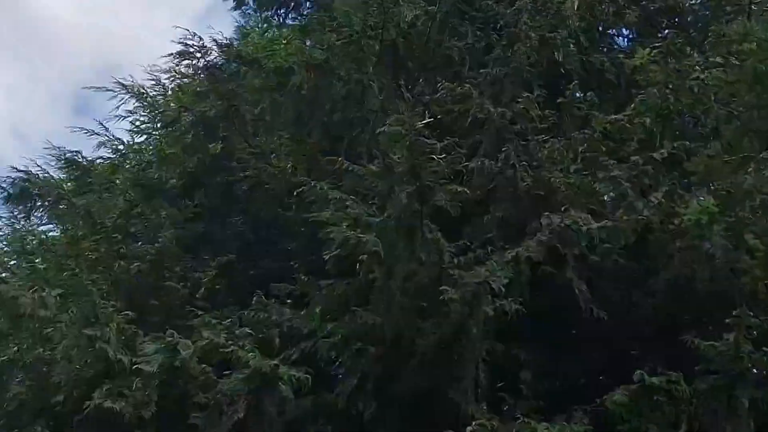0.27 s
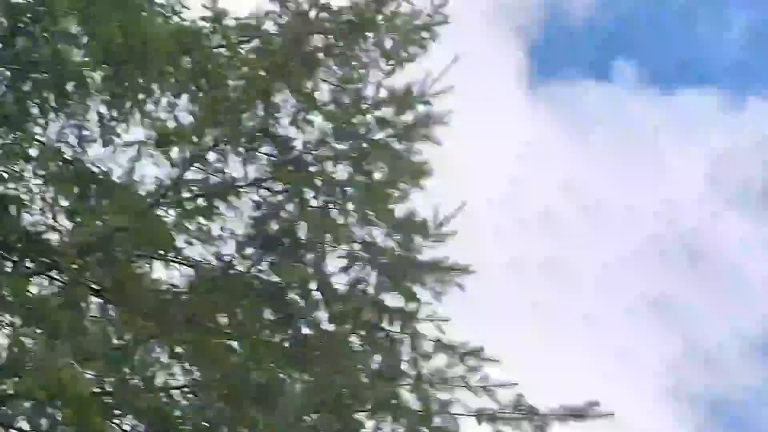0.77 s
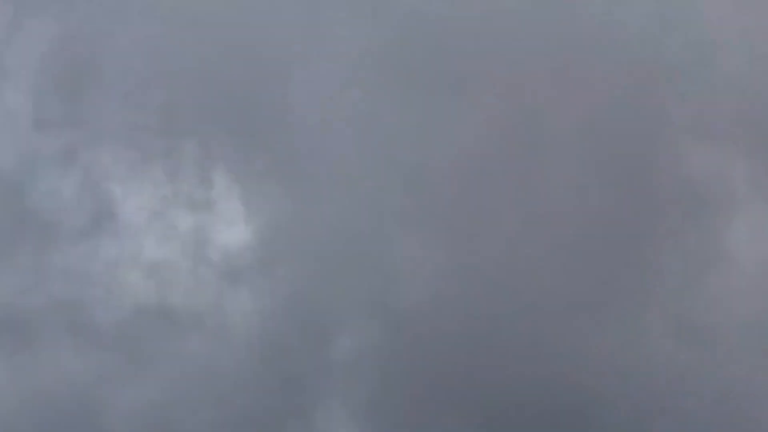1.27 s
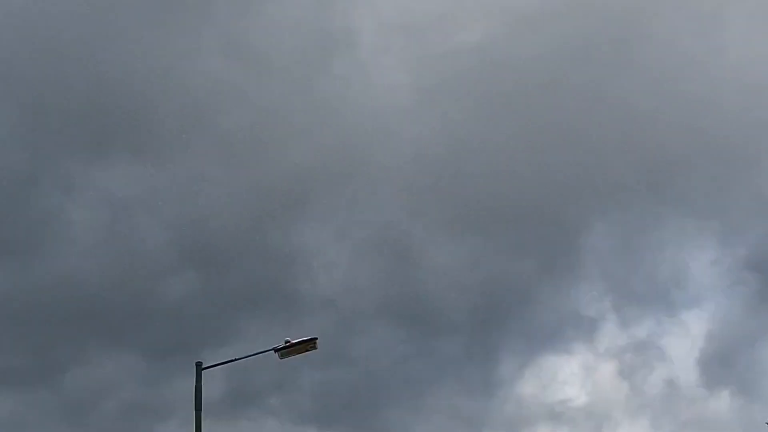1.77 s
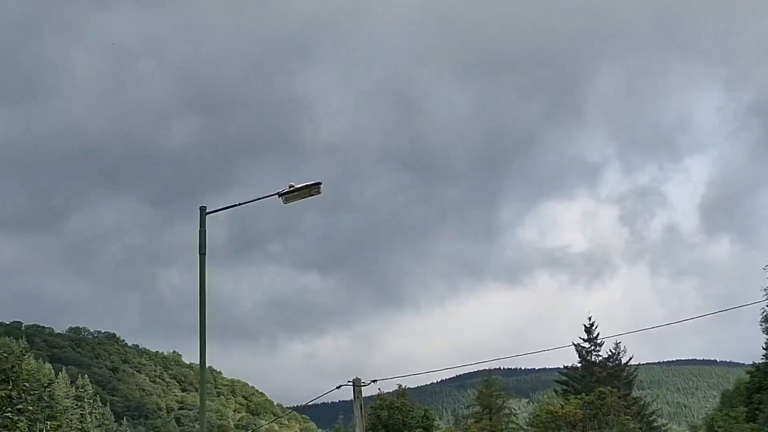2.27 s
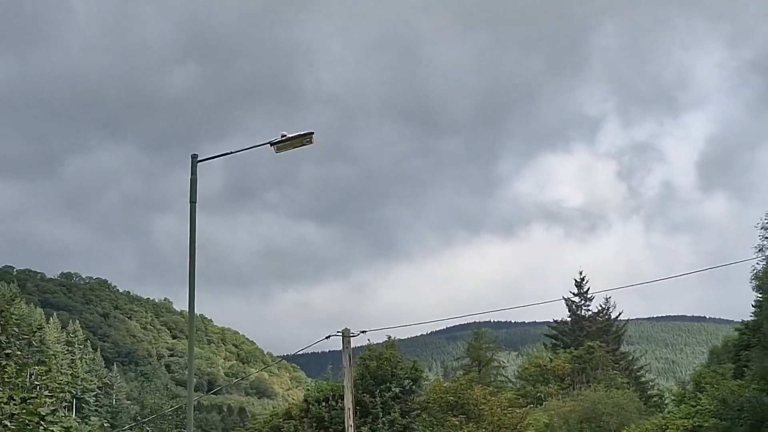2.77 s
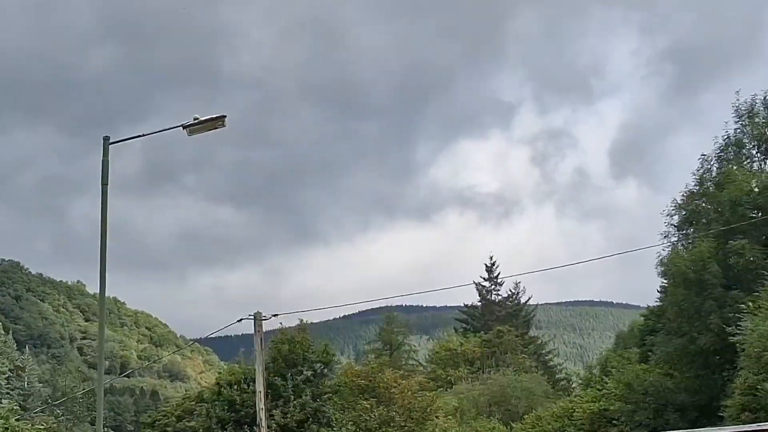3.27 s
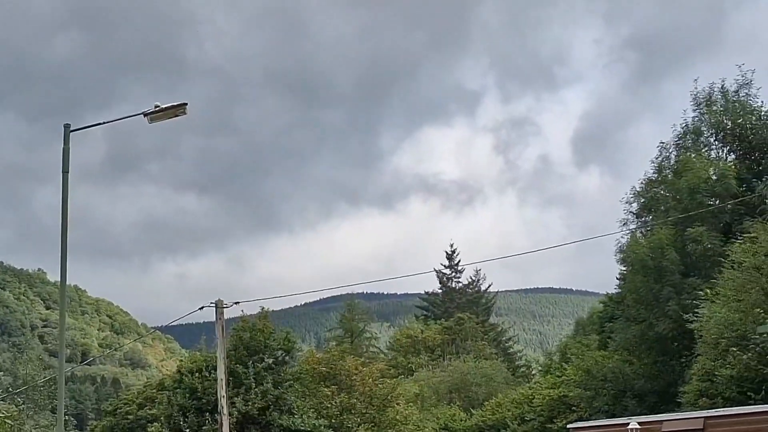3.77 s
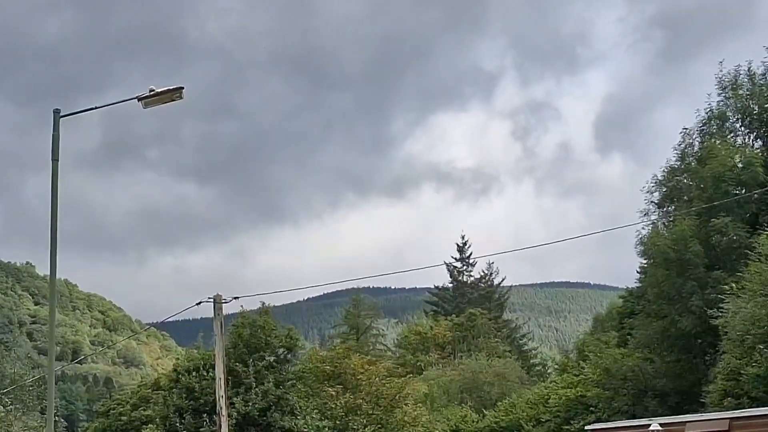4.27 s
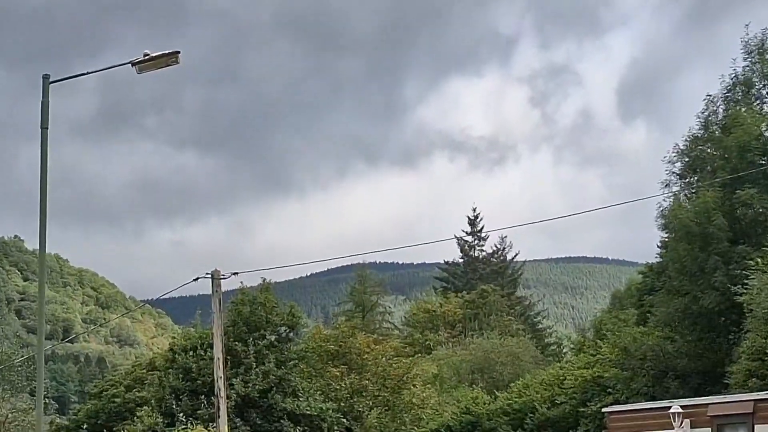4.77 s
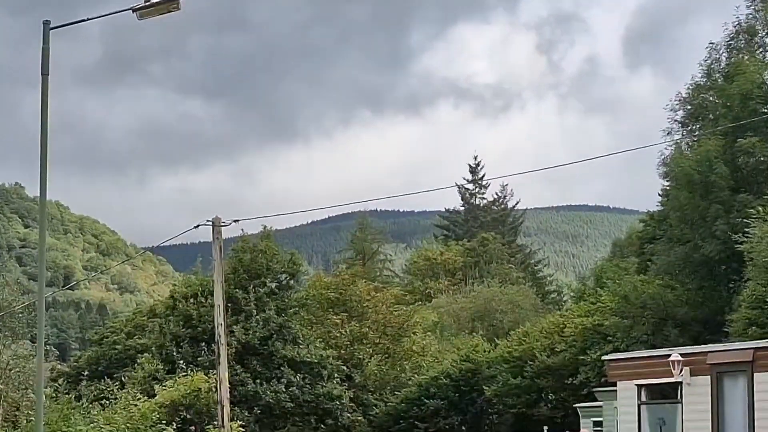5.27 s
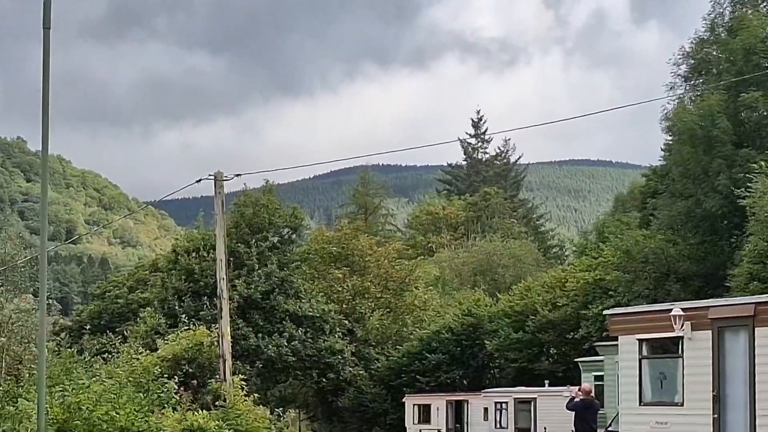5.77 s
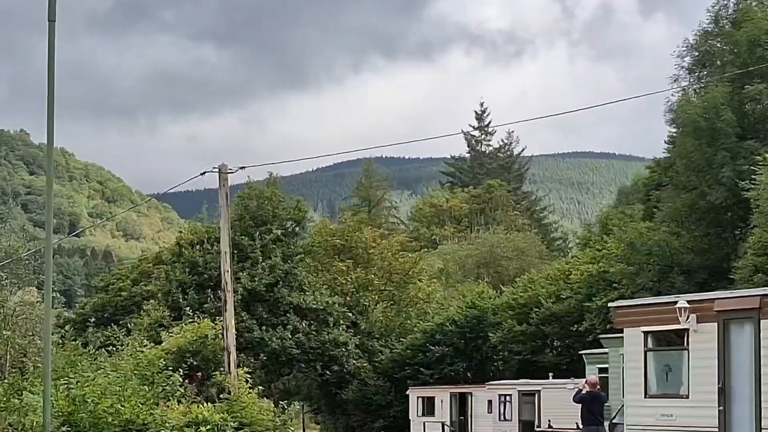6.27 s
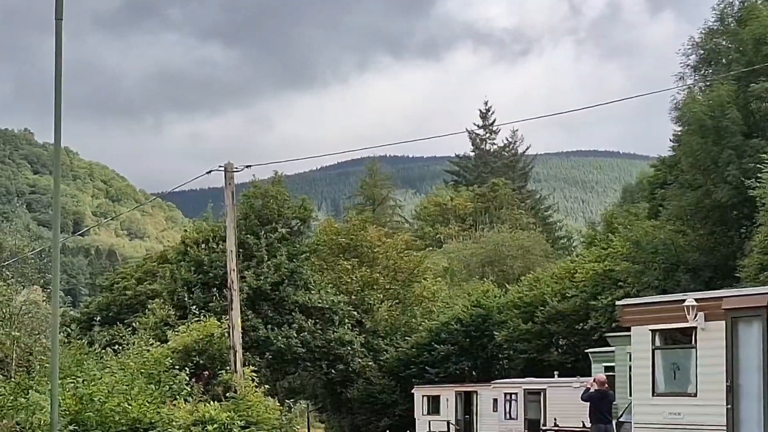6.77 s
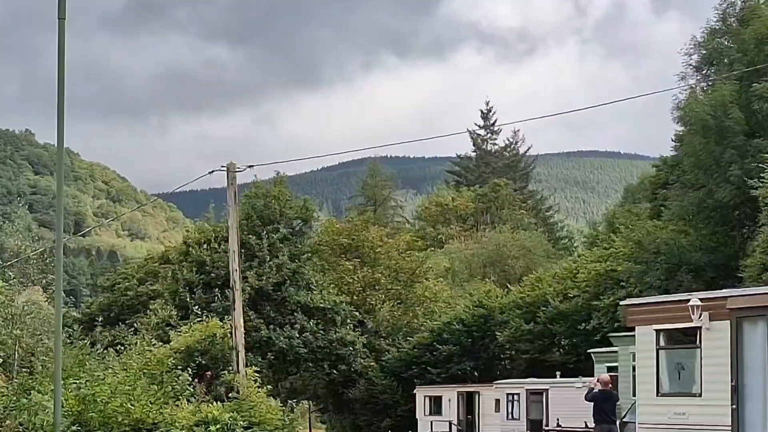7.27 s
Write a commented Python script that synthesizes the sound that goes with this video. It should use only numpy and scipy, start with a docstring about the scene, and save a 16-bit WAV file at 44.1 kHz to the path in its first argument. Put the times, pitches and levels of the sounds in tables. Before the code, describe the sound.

A jet roars low overhead with a crackling rush, then fades to a deep, surging rumble as it flies away.

```python
"""A wooded valley: a jet fighter passes low overhead and flies off, heard on a phone with two ports.
Fine exhaust eddies rush and shock fronts crackle while it is near; then the big eddies behind it roar
and rumble in surges. The ground reflection sweeps through the noise and the air takes the treble away
with distance. Over a faint hiss, a small bird calls and the phone ticks and rustles in the hand."""
import sys
import numpy as np
from scipy import signal
from scipy.fft import rfft, irfft
from scipy.io import wavfile
from scipy.ndimage import uniform_filter1d, minimum_filter1d, map_coordinates

SR = 44100
rng = np.random.default_rng(int(sys.argv[2]) if len(sys.argv) > 2 else 0)


def master(y):
    """Save y as 16-bit WAV."""
    cut = np.clip(np.atleast_2d(y).T, -1, 1)
    pcm = np.round(cut * 32767)  # scale
    wavfile.write(sys.argv[1], SR, pcm.astype(np.int16))


N = 331632
FRAME, HOP = 2048, 256
TIME_S = np.arange(N) / SR
FRAME_S = np.arange(-(-N // HOP) + 1) * HOP / SR
BIN_HZ = np.maximum(np.arange(FRAME // 2 + 1), 1)[:, None] * SR / FRAME


def undb(db):
    """Decibels to gain."""
    return 10 ** (np.asarray(db) / 20)


def curves(table, times_s=FRAME_S):
    """Table columns, interpolated in time."""
    time_s, *columns = np.transpose(table)
    return [np.interp(times_s, time_s, column) for column in columns]


def colour(points, hz=BIN_HZ):
    """Spectrum, interpolated in log frequency."""
    freq_hz, value = np.transpose(points)
    return np.interp(np.log(hz), np.log(freq_hz), value)


def tint(x, points):
    """Causal filter: fronts stay sharp, white noise keeps its power."""
    cepstrum = irfft(np.log(undb(colour(points)[:, 0])))[:FRAME // 2]
    cepstrum[1:] *= 2
    response = irfft(np.exp(rfft(cepstrum, FRAME)))[:FRAME // 2]
    return signal.fftconvolve(x, response[None] / np.linalg.norm(response))[:, :N]


def wander(rate_hz):
    """Random curve in time, spread near 1."""
    return 1.2 * np.interp(FRAME_S * rate_hz, np.arange(400), rng.standard_normal(400))


def flicker(rate_hz, bands):
    """Smooth random field over frequency and time, spread near 1."""
    field = rng.standard_normal((400, bands + 1)).T
    band = bands * np.log(BIN_HZ / BIN_HZ[0]) / np.log(FRAME / 2)
    return 1.26 * map_coordinates(field, np.broadcast_arrays(band, FRAME_S * rate_hz), order=1, mode="wrap")


def band_power(power, band_hz):
    """In-band power per frame."""
    return power[(BIN_HZ[:, 0] >= band_hz[0]) & (BIN_HZ[:, 0] <= band_hz[1])].sum(axis=0)


def eddies(shape_db, level_db, band_hz, comb):
    """Power per bin of a turbulent layer, scaled to level_db in band after the ground comb."""
    power = undb(shape_db) ** 2
    return power / band_power(power * comb, band_hz) * undb(level_db) ** 2


def scatter(x, t60_s, wet_db):
    """Trees and ground add a short diffuse tail, different at each port."""
    t = TIME_S[:SR // 2]
    tail = rng.standard_normal((2, len(t))) * undb(-60 * t / t60_s)
    tail *= undb(wet_db) / np.linalg.norm(tail, axis=1, keepdims=True)
    tail[:, 0] += 1
    return signal.fftconvolve(x[None], tail)[:, :N]


# Rush midrange envelope: time_s, relative_db
RUSH_LEVEL = [(0, -19.5), (0.1, -18.5), (0.4, -17), (0.6, -13), (1.05, -17.5), (1.7, -26.5), (2.4, -27),
              (4, -28), (4.9, -27), (5.95, -22.5), (6.7, -25), (7.5, -25)]
# Rush treble envelope: time_s, relative_db
TREBLE_LEVEL = [(0, -27.5), (0.55, -23.0), (.85, -27), (1.02, -32), (1.2, -30.5), (1.5, -35), (1.8, -38),
                (2.4, -42.5), (3.9, -46), (5.5, -46.5), (6, -44), (6.6, -49), (7.5, -52.5)]
# Rush spectrum: freq_hz, density_db
RUSH_SPECTRUM = [(60, -45.5), (200, -22.5), (400, -6.5), (550, -1), (800, 0.5), (1200, -3), (1500, -3),
                 (2000, -4.5), (2550, -10.5), (3600, -15), (5200, -17.5), (6500, -25.5), (8000, -28),
                 (9500, -36.5), (15000, -44)]
# Flicker from moving air: freq_hz, spread_db
RUSH_FLICKER = [(500, 1.67), (1500, 1.1), (3000, 1.07)]


def rush(distance_m, comb, gain_db=1.5, treble_gain_db=.34, air_db_per_km=29):
    """Fine eddies: a broad rush that flickers in moving air and dulls with distance."""
    mid_hz, treble_hz, apart_oct = (500, 2000), (2200, 5000), 1.7
    level_db, = curves(RUSH_LEVEL)
    air_loss_db = air_db_per_km * distance_m / 1000 * (BIN_HZ / 4000) ** .95
    shape_db = colour(RUSH_SPECTRUM) - np.minimum(air_loss_db, 150)
    # The plume beams treble sideways, so the spectrum tilts as it turns away.
    power = undb(shape_db) ** 2
    brightness_db = 10 * np.log10(band_power(power, treble_hz) / band_power(power, mid_hz))
    beamed_db = curves(TREBLE_LEVEL)[0] + treble_gain_db - level_db
    tilt_db_per_oct = (beamed_db - brightness_db) / apart_oct
    shape_db += tilt_db_per_oct * np.log2(np.clip(BIN_HZ, 600, 6000))
    shape_db += colour(RUSH_FLICKER) * flicker(rate_hz=14, bands=36)
    return eddies(shape_db, level_db + gain_db, mid_hz, comb)


# Roar envelope between surges: time_s, relative_db
ROAR_LEVEL = [(0, -24), (0.4, -21), (0.7, -13), (1.1, -13), (1.5, -17.5), (2.45, -21.5), (3.4, -22.5),
              (4.85, -22), (5.5, -18), (6.1, -16.5), (6.7, -18), (7.5, -13)]
# Roar pitch slide from wind on the way: time_s, shift_oct
ROAR_SLIDE = [(0, -0.16), (.8, -0.031), (1.15, -0.035), (1.5, -0.3), (2, 0.16), (2.25, 0.29), (2.7, -0.1),
              (3, 0.34), (3.25, 0.11), (3.5, -0.18), (3.7, -0.033), (3.95, 0.033), (4.3, -0.37),
              (4.7, -0.034), (5.2, 0.031), (6.1, 0.086), (6.8, -0.2), (7.5, 0.021)]
# Roar spectrum: freq_hz, density_db
ROAR_SPECTRUM = [(90, -48), (160, -14.5), (205, -5.5), (250, -1), (310, 0), (380, -2.5), (460, -6),
                 (650, -20), (1200, -46), (5000, -120)]


def roar(comb, overhead_db=-2, thin_db_per_oct=9, flicker_db=3):
    """Big eddies beam a sliding hump of roar; the phone's microphone adds a hollow resonance."""
    mic_hz, mic_width_hz, mic_lift_db = 312.7, 23, 6.5
    level_db, = curves(ROAR_LEVEL)
    shift_oct, = curves(ROAR_SLIDE)
    shape_db = colour(ROAR_SPECTRUM, BIN_HZ / 2 ** shift_oct)
    overhead = np.interp(FRAME_S, [.6, 1.1], [1, 0])  # side-on, the plume sends little low roar
    shape_db += overhead * thin_db_per_oct * np.minimum(np.log2(BIN_HZ / 300), 0)
    resonance_hz = mic_hz * (1 + .02 * wander(rate_hz=5))
    shape_db += mic_lift_db / (1 + (2 * (BIN_HZ - resonance_hz) / mic_width_hz) ** 2)
    shape_db += flicker_db * flicker(rate_hz=6, bands=40)
    return eddies(shape_db, level_db + overhead * overhead_db, (200, 450), comb)


# Bigger eddies down the plume: time_s, relative_db
BOOM_LEVEL = [(0, -36), (0.4, -25), (0.67, -29.5), (0.85, -20.5), (1.25, -17.5), (1.5, -20), (2.2, -22.5),
              (2.45, -27), (3.1, -23), (3.9, -30.5), (5.2, -28), (6.5, -21.5), (7.5, -21.5)]
# Boom spectrum: freq_hz, density_db
BOOM_SPECTRUM = [(40, -45), (75, -21.5), (100, -0.5), (135, -0.5), (165, -6), (200, -0.5), (260, -18),
                 (500, -49.5), (3000, -120)]
# Far end of the plume: time_s, relative_db
RUMBLE_LEVEL = [(0, -37), (0.65, -36), (0.9, -37), (2.4, -40.5), (2.7, -37), (3.4, -27), (3.6, -35.5),
                (4.05, -34), (4.25, -31), (5, -30), (6.2, -26), (7.5, -29.5)]
# Rumble spectrum: freq_hz, density_db
RUMBLE_SPECTRUM = [(10, -44.5), (28, -17), (42, -6), (58, 12.5), (80, 4), (100, -10.5), (140, -22.5),
                   (300, -54), (2000, -120)]


def rumble(comb, gain_db=-1, flicker_db=2):
    """The slowest eddies grow, and their pitch sinks as the receding jet draws away."""
    patches_db = flicker_db * flicker(rate_hz=6.8, bands=30)
    boom_oct = np.interp(FRAME_S, [.6, 1.1], [.4, 0])
    rumble_oct = np.interp(FRAME_S, [1.3, 2.3], [.21, 0])
    boom_shape_db = colour(BOOM_SPECTRUM, BIN_HZ / 2 ** boom_oct) + patches_db
    rumble_shape_db = colour(RUMBLE_SPECTRUM, BIN_HZ / 2 ** rumble_oct) + patches_db
    boom = eddies(boom_shape_db, curves(BOOM_LEVEL)[0] + gain_db, (90, 200), comb)
    return boom + eddies(rumble_shape_db, curves(RUMBLE_LEVEL)[0] + gain_db, (25, 90), comb)


# Ground reflection, sooner and duller as the jet sinks: time_s, delay_ms, share, cutoff_hz
REFLECTION = [(0, 9.2, 0.8, 1600), (.2, 10.25, 0.9, 1600), (.38, 10.2, 0.88, 1600), (.7, 9.54, 1, 1500),
              (1, 9, 0.49, 1200), (1.5, 7.94, 0.55, 1000), (2, 6.6, 0.83, 800), (2.3, 6.16, 0.24, 750),
              (2.8, 5.76, 0.64, 700), (3, 5.44, 0.07, 750), (3.6, 4.95, 0.43, 700), (4.3, 4.32, 0.24, 550),
              (5.3, 3.3, 0.42, 550), (6, 3.17, 0.65, 493), (7.5, 2.84, 0.28, 502)]


def ground(grass_phase_rad=.47):
    """Direct sound plus its bounce off soft grass: a comb that sweeps up as the delay shrinks."""
    delay_ms, share, cutoff_hz = curves(REFLECTION)
    bounce = np.clip(share, 0, .95) / np.sqrt(1 + (BIN_HZ / cutoff_hz) ** 4)
    return 1 + bounce * np.exp(1j * (grass_phase_rad - 2 * np.pi * BIN_HZ * delay_ms / 1000))


# Likeness of the ports: freq_hz, coherence
PORT_COHERENCE = [(30, .93), (90, 0.98), (300, 1), (420, 0.89), (520, .95), (900, 0.33), (1600, 0.59),
                  (2200, 0.1), (4000, 0.05), (12000, 0.09)]
# Shading by the case: freq_hz, left_minus_right_db
CASE_SHADING = [(40, 1.5), (105, 2), (170, -0.5), (290, 1.5), (430, -1), (700, 1.5), (950, -0.2),
                (1600, -2.5), (3200, 2.5), (5000, 2), (7500, 5), (11000, -2.5)]


def exhaust_noise(power, paths, lead_ms, facing_db_per_ms=6):
    """Noise at two ports: the direct part reaches one first, the part scattered by trees is unrelated."""
    white = rng.standard_normal((3, N))
    direct, *scattered = signal.stft(white, nperseg=FRAME, noverlap=FRAME - HOP)[2]
    coherence = np.clip(colour(PORT_COHERENCE), 0, 1)
    phase_rad = 2 * np.pi * BIN_HZ * lead_ms / 1000
    sides = np.array([1, -1])[:, None, None]
    ports = np.sqrt(coherence) * direct * np.exp(.5j * sides * phase_rad)
    ports += np.sqrt(1 - coherence) * np.array(scattered)
    mono_share = (1 + np.mean(coherence * np.cos(phase_rad) * power, axis=0) / power.mean(axis=0)) / 2
    # The port facing the jet is louder, except in the bass.
    directivity = colour([(500, .014), (900, 1), (1500, .93), (3000, .34)])
    pan_db = colour(CASE_SHADING) + facing_db_per_ms * lead_ms * directivity
    ports = ports * paths * np.sqrt(power / mono_share * FRAME / 2) * undb(sides * pan_db / 2)
    return signal.istft(ports, nperseg=FRAME, noverlap=FRAME - HOP)[1][:, :N]


# Background envelope: time_s, level_db
HISS_LEVEL = [(0, -83), (4.6, -84), (5.6, -80.5), (7.5, -77)]


def hiss():
    """Faint hiss, unrelated at the two ports."""
    spectrum = [(1000, -1.5), (6500, -2.5), (10000, -7), (16000, -14)]
    return undb(curves(HISS_LEVEL, TIME_S)[0]) * tint(rng.standard_normal((2, N)), spectrum)


def shock_front(relax_ms, band_hz=(500, 8500)):
    """One front of peak 1: pressure jumps, relaxes and swings under."""
    jump = np.exp(-TIME_S[:512] * 1000 / relax_ms)
    wave = signal.sosfilt(signal.butter(2, band_hz, "band", fs=SR, output="sos"), jump)
    return wave / wave.max()


# Typical big front: time_s, peak_db
RASP_LEVEL = [(0, -10), (.55, -24), (.9, -22), (1.05, -29), (1.22, -21), (1.43, -30), (1.54, -18),
              (1.8, -36), (2.3, -41), (3, -59.5), (3.5, -88)]
# Single strong fronts: start_s, peak_db, relax_ms
STRONG_FRONTS = [(0.0405, 0, .05), (.514, -6, .06), (.578, -5, .05), (.5875, -4, .1), (.702, -10, .1),
                 (.73, -15, .12), (.9032, -7, .2), (1.139, -17, .1), (1.2145, -14, .06), (1.3676, -7, 0.07),
                 (1.532, -9, .06), (1.5455, -10, .05), (1.553, -15, .06), (1.5624, -4, .04),
                 (2.243, -26, .08)]


def big_shocks(rate_hz=110, spread_db=1):
    """Big fronts arrive whole: a ragged run makes a tearing rasp, a few stand out as cracks."""
    jitter_db = spread_db * np.clip(rng.standard_normal(N), -2, 2)
    peaks = undb(curves(RASP_LEVEL, TIME_S)[0] - jitter_db)
    impulses = (rng.random(N) < rate_hz / SR) * peaks
    rasp = signal.fftconvolve(impulses, shock_front(relax_ms=.12))[:N]
    for start_s, peak_db, relax_ms in STRONG_FRONTS:
        crack = undb(peak_db) * shock_front(relax_ms)
        rasp[int(start_s * SR):][:len(crack)] += crack
    return rasp


# Volleys of small fronts: centre_s, width_s, relative_db
SHOCK_VOLLEYS = [(0.04, .028, -31.5), (0.196, 0.1, -35), (0.362, 0.041, -34), (0.552, 0.14, -29.5),
                 (0.713, 0.057, -40), (0.906, 0.057, -38), (1.1, 0.054, -39), (1.21, 0.055, -41),
                 (1.386, 0.044, -42.5), (1.557, 0.037, -40), (1.628, 0.089, -42.5), (1.85, 0.072, -50.5),
                 (1.962, 0.12, -52), (2.26, 0.1, -53.5), (2.78, 0.13, -60), (3.028, .2, -71)]


def shock_envelope(hold_db=-40.5, overhead_s=.74, fade_db_per_s=18):
    """Small fronts hold until the jet is overhead, then air rounds them off; volleys ride on top."""
    stream = undb(hold_db - fade_db_per_s * np.maximum(FRAME_S - overhead_s, 0))
    centre_s, width_s, relative_db = np.transpose(SHOCK_VOLLEYS)[:, :, None]
    volleys = np.sum(undb(relative_db) * .5 ** ((2 * (FRAME_S - centre_s) / width_s) ** 2), axis=0)
    return np.interp(TIME_S, FRAME_S, np.hypot(stream, volleys))


# Small-front spectrum: freq_hz, density_db
SHOCK_SPECTRUM = [(40, -32.5), (300, -2.5), (1000, -4.5), (2500, 6.5), (5000, 0), (6500, -9), (8200, -7),
                  (9500, -18.5), (13000, -22.5), (16000, -32)]


def small_shocks(rate_hz=1200, spread_db=3.5, spray_db=4.5, smear_samples=130, gain_db=4.5):
    """Leaves smear each small front into a brief spray; only the left port also gets it whole."""
    arrivals = rng.random(N) < rate_hz / SR
    fronts = arrivals * undb(spread_db * np.minimum(rng.exponential(size=N), 3.5))
    fronts /= np.std(fronts)
    energy = signal.lfilter([1 / smear_samples], [1, 1 / smear_samples - 1], fronts ** 2)
    ports = undb(spray_db) * np.sqrt(energy) * rng.standard_normal((2, N))
    ports[0] += fronts
    return tint(ports * shock_envelope() * undb(gain_db), SHOCK_SPECTRUM)


def crackle(lead_ms):
    """Loud exhaust waves steepen into shock fronts, which reach one port before the other."""
    small = small_shocks() * undb([[.7], [0]])
    big = scatter(big_shocks(), t60_s=.016, wet_db=-4) * undb([[0], [-5]])
    left, right = small + big
    lag_samples = np.round(np.interp(TIME_S, FRAME_S, lead_ms) * SR / 1000).astype(int)
    return np.array([left, right[np.clip(np.arange(N) - lag_samples, 0, N - 1)]])


# Surges and lulls: centre_s, width_s, lift_db, pitch_hz, glide_oct_per_s, half_width_oct
GUSTS = [(0.074, 0.031, 4.5, 850, -7, .7), (.15, .05, 3, 2200, 0, 1), (0.235, 0.1, 3, 850, 4, 0.59),
         (0.383, 0.06, 2.5, 3000, 0, 1.3), (.434, 0.036, -3, 1070, 0, 1.3), (.53, .09, 3.5, 1160, 0, 0.28),
         (0.638, 0.05, 1.5, 1450, 0, 0.44), (0.71, 0.07, 5, 3400, -2, 0.47),
         (0.862, 0.091, 2.5, 280, 0, .7), (0.9, 0.085, 2.5, 1410, 8, 1.7), (1.007, .07, -6.5, 380, 7, 1.9),
         (1.115, 0.047, 0.5, 800, 4, 1.7), (1.124, 0.11, 4, 348, -5, .3), (1.242, 0.074, 3, 1900, 3, 2.1),
         (1.285, .1, 6, 130, -1, 0.27), (1.36, 0.22, 4, 380, -1.5, 0.94), (1.46, .12, 2.5, 150, -2, .5),
         (1.379, 0.043, 6, 1780, 0, 1.4), (1.525, 0.043, 6.5, 2450, 0, 0.47),
         (1.55, 0.067, 5, 1100, -2, 2.1), (1.533, 0.11, 5, 115, 0, 0.43), (1.595, 0.24, 5, 410, 0, 1.9),
         (1.733, 0.045, -1.5, 280, 0, 1.8), (1.8, .5, 1.5, 2700, 0, .25), (1.863, 0.091, 6.5, 477, 2, 1.9),
         (1.979, 0.078, 7, 530, 3, 2), (2.19, .1, 3, 310, 1.5, .22), (2.215, 0.14, 9, 200, -2, 1.53),
         (2.23, 0.053, 4, 2200, 2, 1.2), (2.766, 0.22, 8, 170, -3.5, 1.85), (2.78, .13, 4.5, 140, 1, 0.28),
         (2.86, .09, 2.5, 340, 1, .25), (2.952, 0.24, 8.5, 560, 3.5, 1.4), (3.23, 0.25, 5, 109.4, -2, 1.27),
         (3.603, 0.21, 9, 560, 2.5, 1.7), (3.87, .2, 0.5, 380, 5.5, 1.5), (4.231, .2, 3, 229, 2, 1.4),
         (4.513, 0.31, 6, 319, -3, 1.4), (4.85, 0.14, -3.5, 290, 6, 1.5), (5.077, 0.039, 4.5, 340, 0, 0.75),
         (5.4, .12, 2.5, 330, 0, .2), (5.568, 0.11, 6, 320, -2, .45), (5.8, 0.17, -2.5, 301, -1.5, .5),
         (6.05, 0.13, 4, 345, -2, .5), (6.337, 0.087, 4.5, 380, -2, 1), (6.58, .05, -1, 300, 0, .7),
         (6.861, 0.09, 5.5, 240, 4, 1.2), (7.258, 0.099, 2.5, 700, -1, 1.1), (7.382, .12, -2, 270, -4, .7)]


def surges():
    """Gusts bend the noise towards the listener or away: bells of gain in dB around gliding pitches."""
    gain_db = np.zeros((len(BIN_HZ), len(FRAME_S)))
    for centre_s, width_s, lift_db, pitch_hz, glide_oct_per_s, half_width_oct in GUSTS:
        near = np.abs(FRAME_S - centre_s) < 2 * width_s
        offset_s = FRAME_S[near] - centre_s
        offset_oct = np.log2(BIN_HZ / pitch_hz) - glide_oct_per_s * offset_s
        bell = .5 ** ((2 * offset_s / width_s) ** 2 + (offset_oct / half_width_oct) ** 2)
        gain_db[:, near] += lift_db * bell
    return gain_db


# Light touches on the phone: start_s, impulse_db
TOUCHES = [(3.68, -66), (4.32, -64), (7.15, -62), (7.396, -43)]
# Tick spectrum: freq_hz, density_db
TICK_SPECTRUM = [(2000, -22.5), (5000, -9.5), (7800, 7), (10000, -5), (15000, -15)]


def ticks():
    """A fingertip shifts on the case."""
    impulses = np.zeros(N)
    for start_s, impulse_db in TOUCHES:
        impulses[int(start_s * SR)] = undb(impulse_db)
    return tint(scatter(impulses, t60_s=.05, wet_db=13), TICK_SPECTRUM)


# Bird calls: start_s, length_s, start_hz, end_hz, dry_db
BIRD_CALLS = [(4.746, 0.044, 7500, 7500, -86), (5.363, .07, 6940, 6650, -81),
              (5.63, .08, 6840, 6550, -81.5), (5.748, 0.092, 7030, 6500, -78),
              (5.942, 0.085, 7020, 6400, -75), (6.14, .11, 7020, 6540, -76.5),
              (6.463, 0.04, 7650, 7450, -76.5), (6.905, 0.056, 8130, 7850, -74)]


def bird(quaver_hz=150):
    """Thin quavering whistles that hold, then droop, blurred by the wood."""
    song = np.zeros(N)
    for start_s, length_s, start_hz, end_hz, dry_db in BIRD_CALLS:
        progress = np.linspace(0, 1, int(length_s * SR))
        quaver = np.interp(progress, np.linspace(0, 1, 24), rng.standard_normal(24))
        pitch_hz = start_hz + (end_hz - start_hz) * progress ** 2 + quaver_hz * quaver
        envelope = undb(dry_db) * np.sqrt(np.abs(np.sin(np.pi * progress)))
        note = envelope * np.sin(2 * np.pi * np.cumsum(pitch_hz) / SR)
        song[int(start_s * SR):][:len(note)] += note
    return scatter(song, t60_s=.55, wet_db=5) * undb([[1], [-6]])


def rustle(peak_s=7.4, rub_db=-82, slope_db_per_s=14, uneven_db=4.5, slide_db=-69, slide_s=.06):
    """Skin rubs unevenly on the case, building to the firmest touch, then slides on briefly."""
    from_peak_s = np.abs(TIME_S - peak_s)
    jitter_db = uneven_db * np.interp(TIME_S, FRAME_S, wander(rate_hz=16))
    rub = undb(rub_db - slope_db_per_s * from_peak_s + jitter_db)
    slide = undb(slide_db) * (TIME_S > peak_s) * np.exp(-from_peak_s / slide_s)
    spectrum = [(2000, -4.5), (5000, 0), (8000, -1), (11000, -5), (15000, -6.5)]
    return tint(rng.standard_normal((2, N)) * (rub + slide), spectrum)


# Flight path: time_s, distance_m, left_lead_ms
FLIGHT_PATH = [(0, 150, -0.18), (.4, 130, -0.15), (.7, 37, -0.012), (1.1, 40, 0.27), (1.6, 120, 0.31),
               (2.1, 380, 0.32), (3.2, 610, 0.31), (4, 1120, 0.31), (5, 1300, 0.31), (6, 1620, 0.3),
               (7.5, 1600, 0.31)]


def scene(swell_db=.3):
    """The jet and its ground reflection over the quiet valley."""
    distance_m, lead_ms = curves(FLIGHT_PATH)
    paths = ground()
    comb = np.abs(paths) ** 2
    low_power = (roar(comb) + rumble(comb)) * undb(swell_db * wander(rate_hz=13)) ** 2
    power = (low_power + rush(distance_m, comb)) * undb(surges()) ** 2
    background = hiss()
    jet = exhaust_noise(power, paths, lead_ms) + crackle(lead_ms)
    return jet + bird() + ticks() + rustle() + background


def record(dry, ceiling=.97, cutoff_hz=15700):
    """Smooth peak limiter, then a steep low-pass."""
    peak = np.maximum(np.abs(dry).max(axis=0), 1e-6)
    held_gain = minimum_filter1d(np.minimum(1, ceiling / peak), size=801)
    gain = uniform_filter1d(uniform_filter1d(held_gain, size=401), size=401)
    return signal.sosfilt(signal.ellip(8, .2, 70, cutoff_hz, fs=SR, output="sos"), dry * gain)


dry = scene()
out = record(dry)
master(out)
```